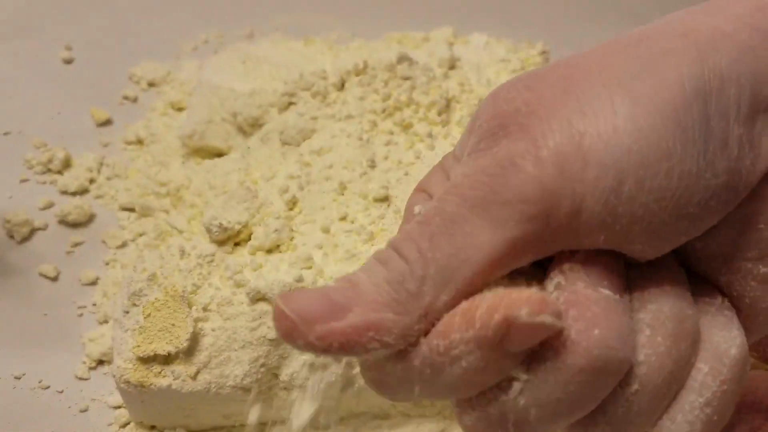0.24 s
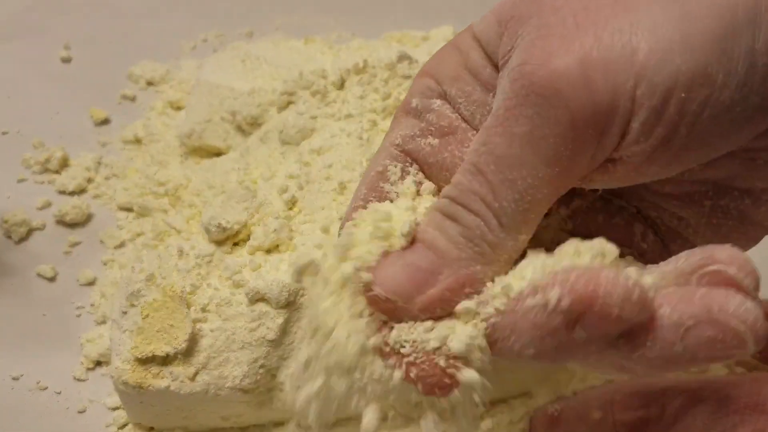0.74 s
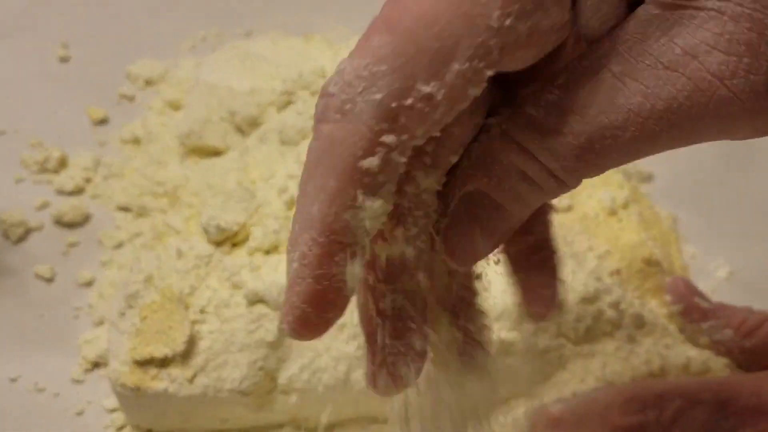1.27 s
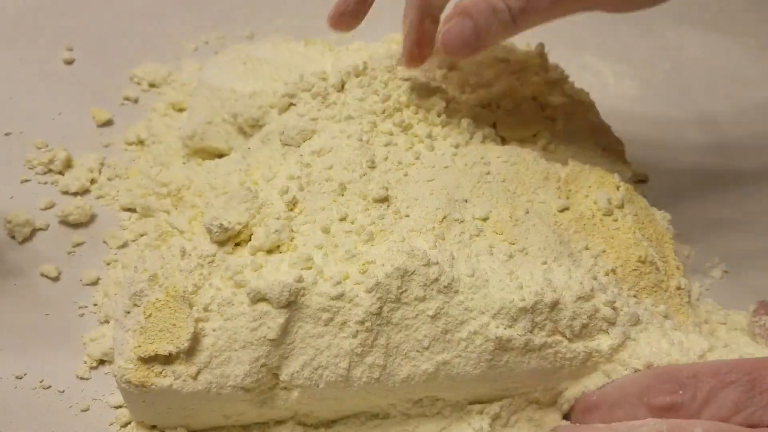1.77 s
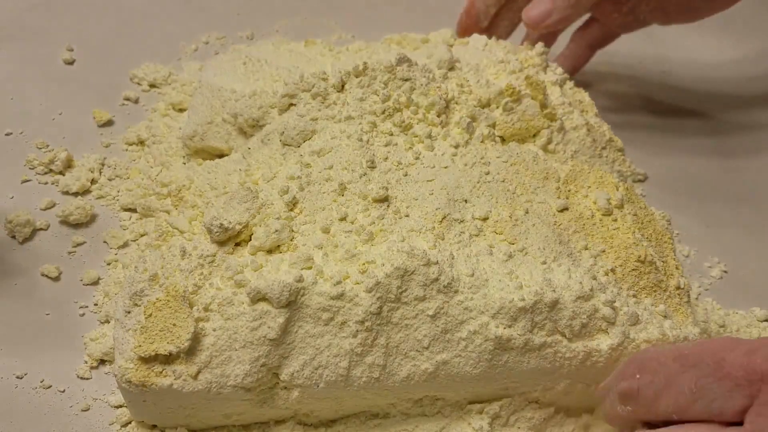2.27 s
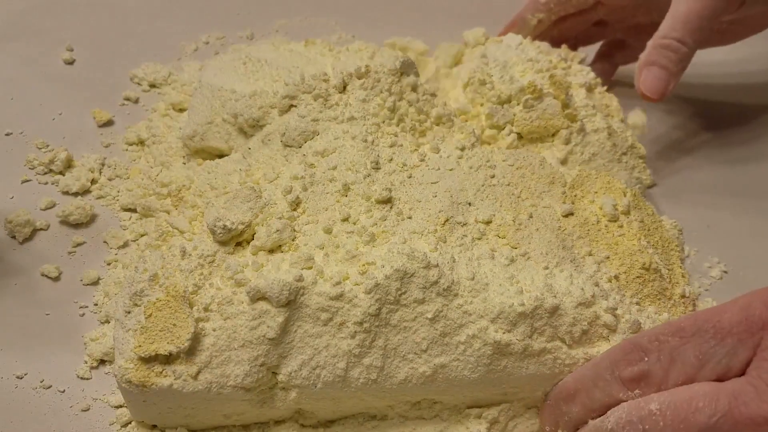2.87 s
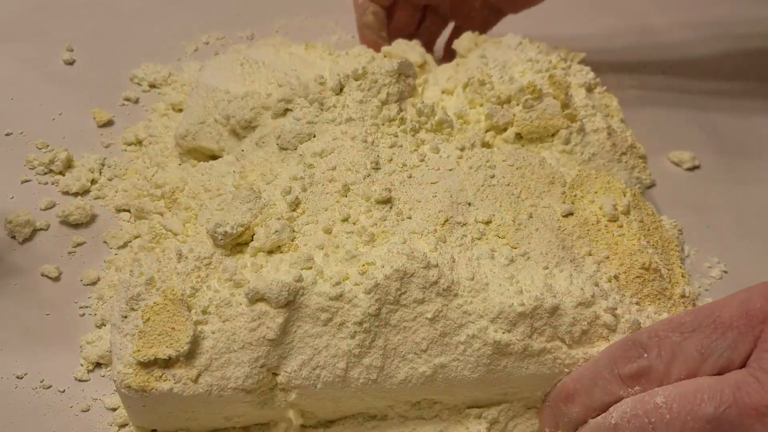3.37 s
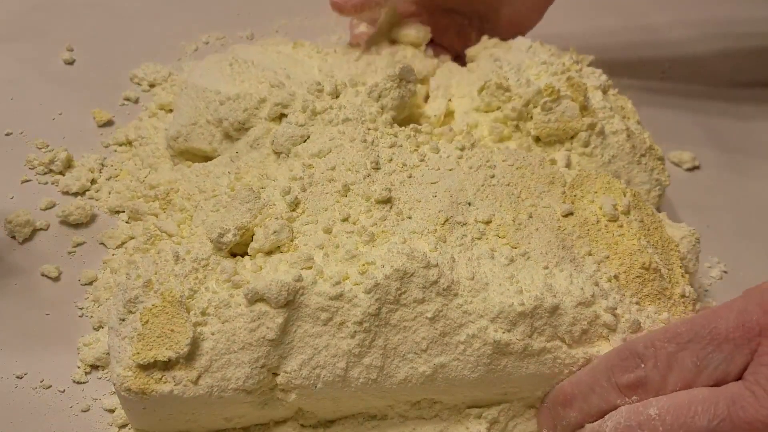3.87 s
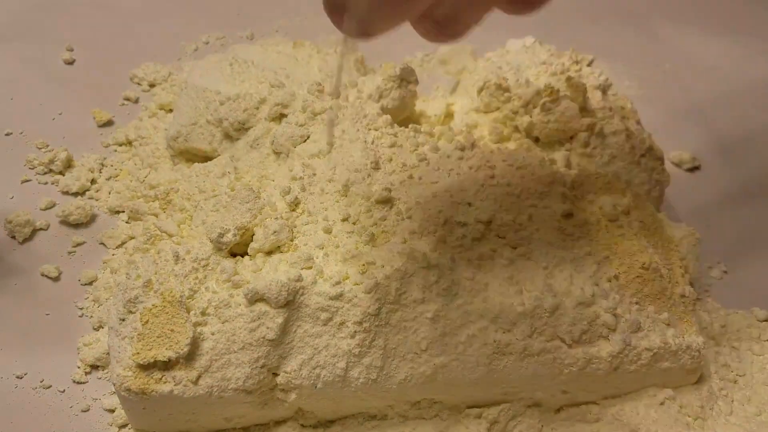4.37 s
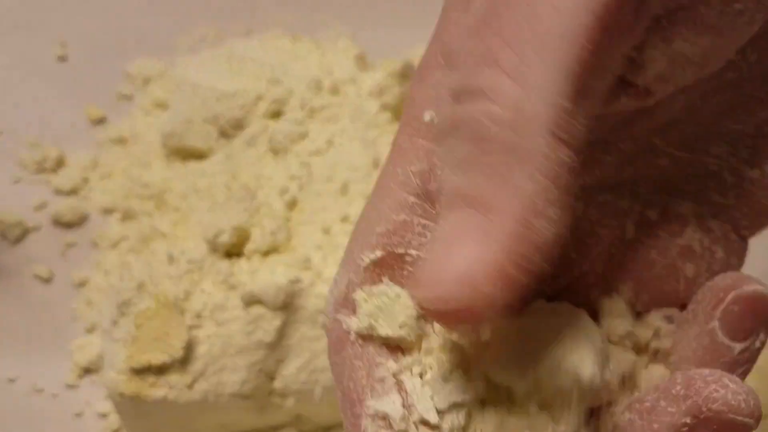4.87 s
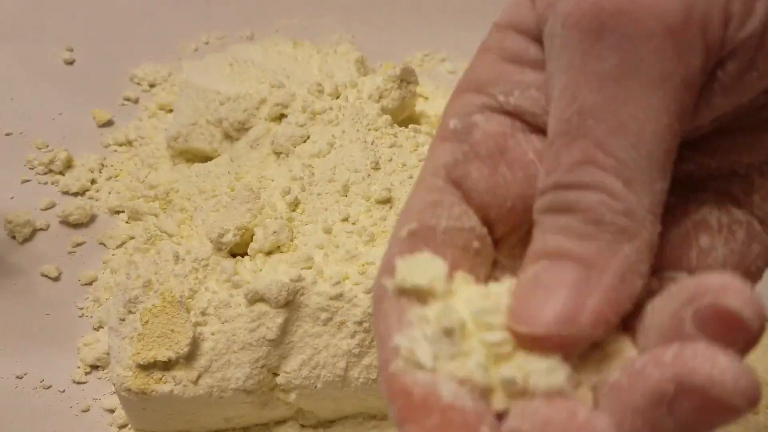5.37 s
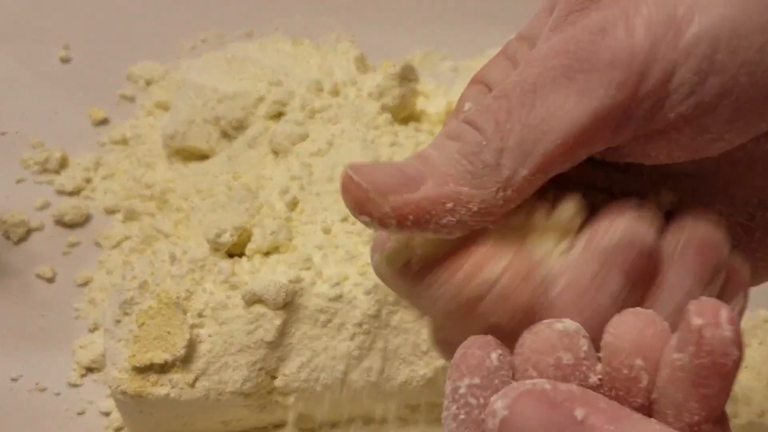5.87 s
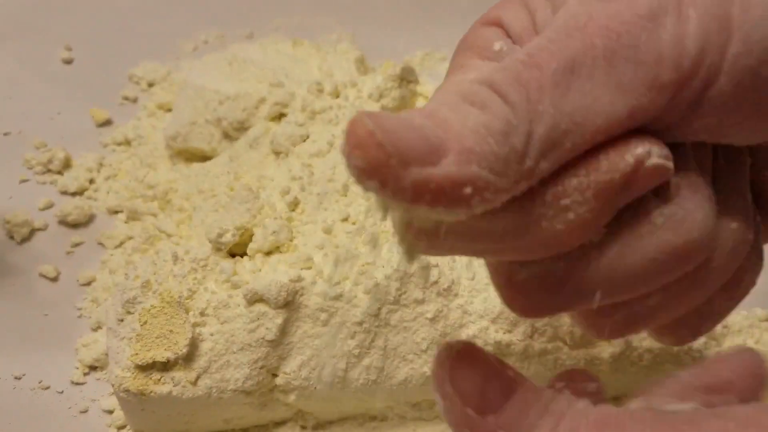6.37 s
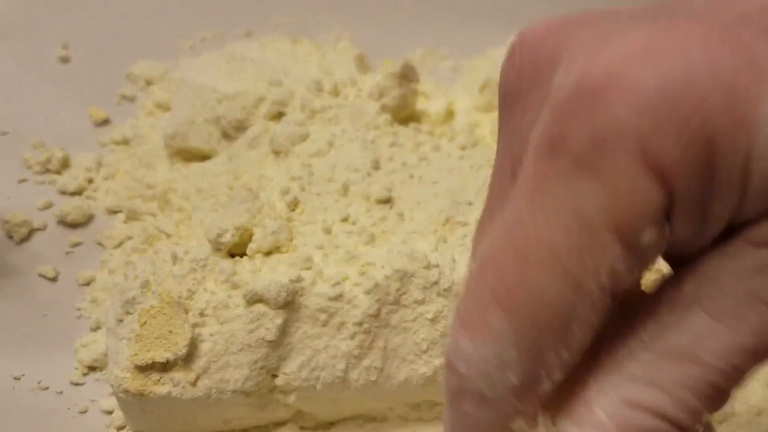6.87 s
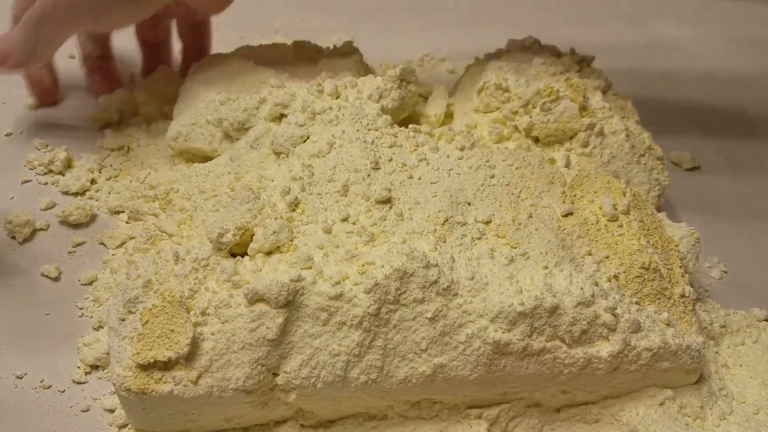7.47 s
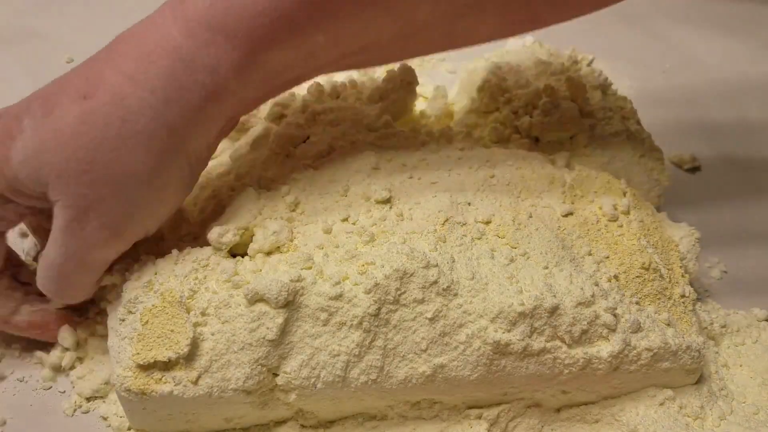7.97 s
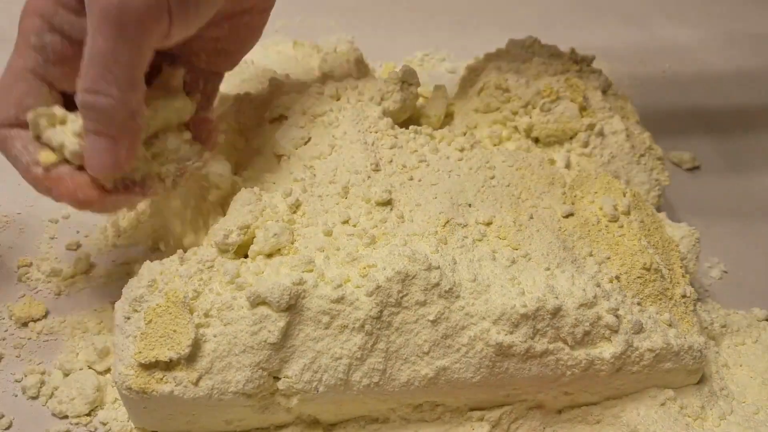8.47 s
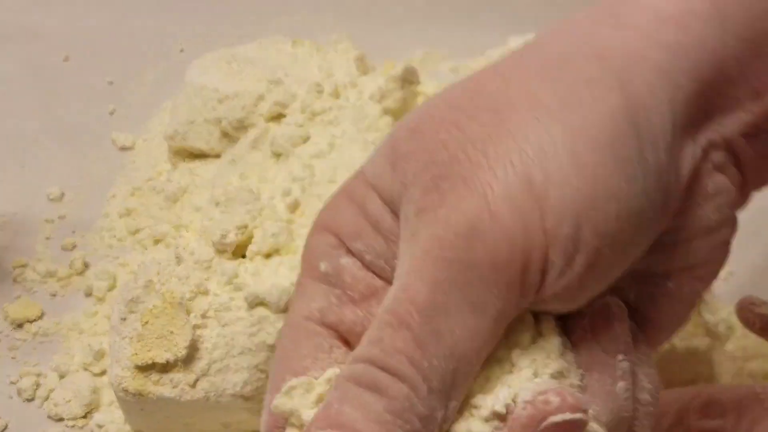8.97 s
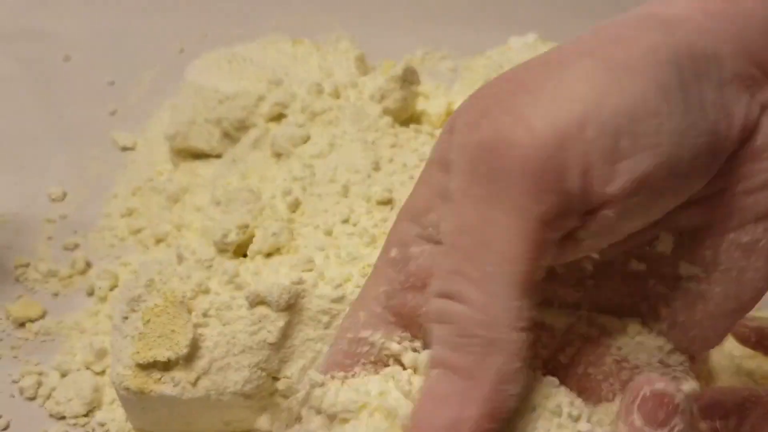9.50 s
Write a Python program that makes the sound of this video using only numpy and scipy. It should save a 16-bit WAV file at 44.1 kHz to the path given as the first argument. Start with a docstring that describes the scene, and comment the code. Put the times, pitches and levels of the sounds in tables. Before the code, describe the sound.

Hands crush dry pressed powder with crackles, crunches and hissing trickles, rake the pile over a table, then break lumps loudest near the end.

```python
"""Lumps crack off a slab of dry pressed powder, snap, and knock on a paper-covered table, heard from close by.
Each break is a click and a spray of noise, ringing in short resonances and in the modes of the table top.
Around it are streams of tiny random impacts: hissing powder, rubbing skin, pattering crumbs, a rumbling rake.
Creaks, pinging chips, dry ticks and soft hand bumps are placed one by one.
A stereo microphone pair hears it all in a small room with still air and a faint, unsteady hum."""
import sys
import numpy as np
from scipy import signal
from scipy.fft import rfft, irfft, next_fast_len
from scipy.io import wavfile
from scipy.ndimage import map_coordinates

SR = 44100
rng = np.random.default_rng(int(sys.argv[2]) if len(sys.argv) > 2 else 0)


def master_out(mix):
    """Clip the mix to full scale and print it as 16-bit PCM to the path in sys.argv[1]."""
    frames = np.transpose(np.atleast_2d(mix))
    ceiling = np.clip(frames, -1, 1)
    pcm = np.round(ceiling * 32767).astype(np.int16)
    wavfile.write(sys.argv[1], SR, pcm)


N = 429534

# Colour of the room's still air. Each row: frequency in Hz, relative level in dB per Hz.
AIR_COLOUR = [(20, 0), (50, 10), (90, 11.5), (135, 23), (200, -27.5), (330, 7), (700, -13), (2000, -53),
              (6000, -28), (16000, -80)]
# Decay of the small room. Each row: frequency in Hz, time to fall 60 dB in seconds.
WALL_DECAY = [(120, 0.04), (600, 0.2), (3000, 0.14), (14000, 0.02)]
# Ringing modes of the table top. Each row: frequency in Hz, gain at resonance in dB, time to fall 60 dB in seconds.
TABLE_MODES = [(81, -7, 0.1), (135, 3.5, 0.19), (256, -2, 0.26), (364, -10, 0.62), (572, -5.5, 0.17),
               (970, -7, 0.27)]
# Soft bumps of the hand on the table. Each row: start in seconds, peak level in dB.
HAND_BUMPS = [(4.178, -45.5), (4.907, -27), (4.931, -29.5), (5.236, -43)]
# Single crumbs clicking in the treble. Each row: time in seconds, strike level in dB.
CRUMB_TICKS = [(0.3077, -50), (0.467, -52), (0.608, -43), (1.1706, -65), (1.2235, -49), (1.393, -46),
               (1.4386, -38), (1.4714, -47), (1.5585, -49), (4.8642, -48), (6.6126, -43), (6.6434, -45.5)]
# Hard chips that ping as they split off. Each row: time in seconds, pitch in Hz, strike level in dB.
HARD_CHIPS = [(.9463, 1750, -44), (2.5358, 2880, -45), (4.9086, 2370, -47), (5.0721, 1630, -48),
              (5.9063, 2700, -44.5), (5.943, 2744, -48), (6.8655, 1750, -47.5), (8.9425, 2394, -37.5),
              (8.9585, 2284, -34.5), (9.0654, 2696, -42.5)]
# Powder creaking under a finger, or dragged low over the table. Each row: start in seconds, length in seconds,
# first pitch in Hz, last pitch in Hz, width in Hz of each of two equal filters at the first pitch, rms level in dB.
CREAKS = [(0.702, 0.077, 3070, 2570, 1000, -54), (0.897, 0.064, 1620, 1910, 500, -58),
          (2.396, 0.053, 672, 580, 420, -52.5), (3.089, 0.082, 507, 517, 109.8, -48.5),
          (3.127, 0.15, 473, 420, 260, -54), (3.084, 0.12, 2050, 1600, 1300, -59),
          (3.3, 0.596, 135, 135, 21.9, -52), (4.182, 0.067, 1490, 1510, 795, -52.5),
          (4.222, 0.21, 1500, 1700, 750, -60), (4.6, 0.11, 1000, 1450, 450, -63),
          (4.953, 0.32, 135, 135, 25, -51), (4.968, 0.14, 1600, 1600, 600, -56),
          (5.41, 0.25, 2880, 2080, 807, -64.5), (5.907, 0.018, 2750, 2760, 600, -45.5),
          (6.063, 0.14, 2380, 1885, 796, -63), (7.421, 0.31, 990, 1054, 377, -49),
          (7.454, 0.16, 140.8, 119.8, 70, -33.5), (7.744, 0.42, 938, 1090, 600, -58.5)]
# Crumbs spilling onto the table. Each row: peak in seconds, fall to 10 dB down in seconds,
# patter level in dB, rumble level in dB (both before the trims in crumbs).
CRUMB_SPILLS = [(.02, 0.13, -43.5, -43), (.21, 0.12, -43.5, -43), (.5, 0.055, -54, -48),
                (.73, 0.18, -55, -49), (.88, 0.049, -56, -42.5), (1.06, 0.15, -55, -55),
                (1.25, 0.059, -53.5, -47), (1.335, 0.08, -41.5, -57), (2.43, 0.023, -51.5, -53),
                (2.94, 0.036, -61, -48.5), (3.16, 0.077, -49, -50), (3.34, 0.15, -53, -48),
                (3.58, 0.1, -58, -47.5), (3.76, 0.041, -57.5, -47.5), (4.218, 0.11, -58, -58),
                (4.45, 0.079, -55, -56), (4.59, 0.049, -53, -65), (4.99, 0.088, -51, -48),
                (5.67, 0.11, -57, -56), (5.77, 0.075, -50.5, -45), (6.28, 0.022, -50, -60),
                (6.42, 0.058, -70, -50), (6.52, 0.28, -60, -59), (6.799, 0.047, -48, -46),
                (6.96, 0.1, -53, -45.5), (7.03, 0.11, -46.5, -39.5), (9, 0.095, -57, -50),
                (9.224, 0.026, -38, -34), (9.318, 0.59, -50.5, -43), (9.56, 0.15, -47, -41),
                (9.689, 0.2, -46, -44)]
# One long rake through the pile, easing off as the hand closes. Each row: time in seconds,
# patter level in dB, rumble level in dB (both before the trims in crumbs).
RAKE_LEVELS = [(7.285, -68.5, -67.5), (7.303, -48, -21.5), (7.36, -45, -38.5), (7.43, -50, -40),
               (7.49, -50, -30), (7.505, -37, -36), (7.58, -35, -34.5), (7.71, -44, -35.5),
               (7.84, -52.5, -35.5), (7.93, -51.5, -36), (8.03, -53, -46), (8.15, -57, -41.5),
               (8.4, -73, -59)]
# Fingers squeezing or stroking the powder. Each row: peak in seconds, rise from and fall to 10 dB down in seconds,
# powder hiss level in dB (before the lift in powder), skin rub level in dB.
FINGER_STROKES = [(.03, 0.19, 0.12, -50, -49.5), (.18, 0.052, 0.11, -49.5, -56.5),
                  (.33, 0.024, 0.29, -63, -60), (.47, 0.0071, 0.076, -57, -64),
                  (.54, 0.041, 0.19, -60, -55), (.71, 0.01, 0.075, -54, -51),
                  (.92, 0.082, 0.059, -55, -54.5), (1.24, 0.012, 0.12, -54, -57.5),
                  (1.32, 0.048, 0.059, -54, -55), (1.42, 0.19, 0.072, -50, -54.5),
                  (1.55, 0.15, 0.05, -52.5, -57.5), (1.67, 0.014, 0.066, -67, -57.5),
                  (1.78, 0.068, 0.63, -62, -58.5), (2.05, 0.096, 0.38, -58.5, -57.5),
                  (2.43, 0.082, 0.059, -62.5, -56), (2.7, 0.3, 0.39, -62.5, -60.5),
                  (3.18, 0.19, 0.11, -55, -56), (3.45, 0.25, 0.44, -65, -60.5),
                  (3.98, 0.073, 0.11, -71.5, -63.5), (4.29, 0.061, 0.1, -58, -70),
                  (4.58, 0.42, 0.28, -57, -56), (5, 0.095, 0.096, -49, -49.5),
                  (5.245, 0.091, 0.017, -63.5, -60), (5.64, 0.22, 0.048, -58, -54),
                  (5.75, 0.12, 0.22, -59.5, -58.5), (5.92, 0.02, 0.17, -58, -56),
                  (6.09, 0.065, 0.34, -62.5, -59), (6.315, 0.15, 0.067, -57, -51.5),
                  (6.42, 0.026, 0.23, -65.5, -70), (6.62, 0.041, 0.066, -60, -55.5),
                  (6.74, 0.029, 0.029, -53, -48), (6.8, 0.058, 0.17, -58, -60), (7, 0.24, 0.23, -48, -47),
                  (7.22, 0.15, 0.048, -54.5, -49.5), (7.31, 0.012, 0.11, -56, -51.5),
                  (7.5, .13, 0.39, -46.5, -51.5), (7.57, 0.064, 0.045, -56, -42),
                  (7.97, 0.18, 0.13, -53, -59), (8.18, 0.17, 0.14, -62, -60),
                  (8.475, 0.027, 0.22, -54.5, -51), (8.64, 0.17, 0.18, -50, -58),
                  (8.95, 0.18, 0.49, -43.5, -52), (9.19, 0.026, 0.17, -51, -60),
                  (9.64, 0.087, .13, -45.5, -54.5)]
# Lumps that break or land. Each row: time in seconds, then the strike level in dB of
# its knock, thud, snap and crack (before panning, filters and resonances).
BREAKS = [(0.0446, -40, -38, -48, -50), (0.0496, -44, -46, -38.5, -57), (0.1552, -39, -41, -42, -51.5),
          (0.186, -39, -37, -53, -44), (0.2164, -52, -35.5, -50, -48), (0.2348, -43.0, -63, -54, -47),
          (0.3013, -49, -48, -57, -53), (0.3275, -38.5, -45, -45, -48), (0.3354, -41.5, -73, -57, -43.5),
          (0.4719, -49, -58, -62, -49), (0.5096, -44.5, -52, -48, -53), (0.5838, -54, -48, -48, -43.5),
          (0.7023, -47, -51, -53, -41), (0.7329, -38, -43, -53, -46), (0.7654, -43.5, -41.5, -52.5, -47.5),
          (0.7954, -41.5, -45, -54.5, -51), (0.8641, -45, -49, -61.5, -59), (0.8712, -36, -38, -47, -48),
          (0.8808, -46, -45, -60, -58), (0.9268, -46.5, -59, -57, -56.0), (0.9982, -43, -40, -48, -44),
          (1.0573, -55, -46, -53, -48), (1.0709, -45.5, -69, -46.5, -49.5), (1.3024, -48, -43, -43, -37.5),
          (1.3176, -43, -42, -44.5, -39.5), (1.3255, -45, -41, -44, -46), (1.3549, -45.5, -46, -56, -41),
          (1.405, -52.5, -70, -44, -41), (1.4574, -43.5, -53, -41, -49), (2.4242, -49, -51.5, -51, -65.0),
          (2.5358, -50.5, -58, -48, -73), (3.7869, -54.5, -50, -66, -65), (4.3004, -54, -50, -55, -55),
          (4.5095, -58, -61, -58, -61.5), (4.5571, -50.5, -41, -67.5, -65.5), (4.5685, -42, -58, -48, -61),
          (4.5809, -52, -49, -57, -62), (4.6377, -51, -63, -65, -60.5), (4.7794, -47.5, -46, -54, -48.5),
          (4.914, -42.5, -51, -54, -54), (4.9804, -45.5, -64, -58.0, -62), (5.6463, -51.5, -48, -53, -66),
          (5.7394, -47.5, -42, -42.5, -60), (5.9063, -52, -60, -46, -50.5), (5.9132, -47.5, -64, -56, -41),
          (5.9427, -48.5, -72.5, -51, -40), (6.0513, -44, -58, -64.0, -62), (6.0719, -40, -54, -45, -62),
          (6.2701, -52, -42.5, -54.5, -49), (6.4034, -49, -37.5, -48.5, -44), (6.5067, -52, -53, -65, -54),
          (6.6337, -45.5, -47.0, -59, -52), (6.749, -50, -71.0, -52, -55.0),
          (6.7829, -45.5, -53, -60, -46.5), (6.8062, -46, -47.5, -71, -64.0),
          (6.8228, -45, -49, -66, -56.5), (6.9977, -44, -42, -50, -54), (7.0283, -54, -41, -59.0, -58),
          (7.0959, -46, -41, -62.5, -58.5), (7.3029, -43.5, -33, -45, -54.5),
          (7.3289, -47, -28, -59, -60.5), (7.4815, -40, -29, -57, -57), (7.5012, -33, -46, -52, -54.5),
          (7.5174, -36, -41, -46, -55), (7.538, -43, -28, -52, -58),
          (7.5625, -45, -39, -32, -54),(7.7019, -37.5, -34, -65.0, -57.0), (7.7592, -43, -35, -71, -61.0),
          (7.8699, -61, -35, -67.0, -60.5), (7.9207, -43.5, -32.5, -55, -63),
          (8.7957, -47, -59, -49, -51.5), (8.846, -42.5, -59, -66, -39), (8.9123, -39, -42.0, -45, -29),
          (8.9425, -41, -46, -46, -35), (8.9586, -33, -37.5, -32, -37), (8.9845, -29.5, -36, -48, -47),
          (9.0017, -38.5, -44, -47, -39.5), (9.0482, -38.5, -41, -40.5, -34),
          (9.0844, -34, -35.5, -59, -37), (9.1705, -40, -37, -61.0, -54), (9.1859, -35.5, -39, -55.0, -38),
          (9.1954, -28, -24, -61, -38), (9.222, -36, -39, -41, -40.5), (9.2424, -39, -41.5, -46.0, -50),
          (9.2744, -36.5, -59.5, -47, -51.0), (9.3855, -39.5, -45, -46, -52), (9.419, -46, -50, -44, -39),
          (9.4771, -46, -42, -49, -56), (9.5289, -35, -51, -46, -42), (9.5864, -44, -58, -43, -42),
          (9.7294, -42.5, -48, -56, -55)]
# Resonances of a knock on the table. Each row: centre frequency in Hz, Q, gain as a factor.
KNOCK_MODES = [(602.3, 19, 0.94), (1007, 22, 0.68)]
# Colours of the contacts: low thud, woody knock, snap, fine powder, skin on chalk.
# Each row: frequency in Hz, relative level in dB per Hz.
THUD_COLOUR = [(30, -44), (70, -27.5), (105, -6.5), (135, -3), (170, -1.5), (205, -2), (245, -4), (310, -8),
               (450, -8.5), (1200, -100)]
KNOCK_COLOUR = [(100, -28.5), (240, -5.5), (300, 0.5), (370, 1), (430, -9), (500, -0.5), (590, 2),
                (690, 0.5), (800, -4), (980, -5.5), (1250, -16.5), (2200, -23.5), (6000, -63.5)]
SNAP_COLOUR = [(300, -24), (900, 3.5), (1500, 0), (2000, -3), (2800, -10), (3800, -21), (12000, -46)]
POWDER_COLOUR = [(800, -46), (2500, -4.5), (4200, -4.5), (6000, -4), (8600, 0.5), (9800, -0.5),
                 (12000, 1.5), (15500, 0.5)]
RUB_COLOUR = [(300, -24.5), (900, -1.5), (1450, 0.5), (2000, -0.5), (2350, -1), (2800, -1), (3600, -5),
              (5000, -9), (12000, -26.5)]
# Place of the working hand. Each row: time in seconds, delay of the left microphone behind the right in ms.
HAND_DELAY = [(1.3, -0.013), (1.8, 0.05), (2.5, 0.17), (3, -0.0073), (6.8, -0.034), (7.3, -.24),
              (8.3, -0.22), (8.7, -0.048)]
# Colour difference of the microphones. Each row: frequency in Hz, left minus right in dB.
MIC_COLOUR = [(60, -1), (640, -0.4), (1200, -1.2), (3100, -0.5), (6820, 0.4), (15000, 2)]

TOP_HZ = 16050  # band limit of the recorder
STROKE_SHAPE, SPILL_SHAPE = 1.5, 0.86  # swell peaks: 1 = pointed, 2 = rounded
SPILL_RISE_S = 0.046  # rise from 10 dB down
SIFT_DB = (-71, -67.5)  # hiss and rub between strokes, before the lift in powder
SETTLE_DB = (-65, -62)  # patter and rumble between spills, before the trims in crumbs
BITS_PER_S = 70  # small lumps a second where the hiss is loudest
BIT_DB = (-3.5, -9.5, -5, -2.5)  # their knock, thud, snap and crack over the hiss level
STRIKE_S = 0.0069  # a strike level is the rms as if all the energy fell in this time
CHIP_Q = 2.4
SNAP_HZ = 1880
KNOCK_SPREAD, SNAP_SPREAD = 0.041, 0.43  # random pitch spread, in natural-log units
LEAD_S = 0.01  # each break starts this long before its main snap


def amp(db):
    """Decibels to gain."""
    return 10 ** (np.asarray(db) / 20)


def unit(x):
    """Scaled to rms 1."""
    return x / np.sqrt(np.mean(x ** 2) + 1e-20)


def along(points, hz):
    """(Hz, value) points read on a log frequency axis."""
    f, v = np.transpose(points)
    return np.interp(np.log(hz + 1), np.log(f), v)


def curves(rows):
    """One level per sample for each dB column after the time; silent outside the rows."""
    s, *columns = np.transpose(rows)
    now = np.arange(N) / SR
    return [np.interp(now, s, c, left=-np.inf, right=-np.inf) for c in columns]


def swells(events, shape, rest_db):
    """dB curves of overlapping swells, each 10 dB down one rise before its peak and one fall after it."""
    t = np.linspace(0, N / SR, 4000)
    power = np.outer(amp(rest_db) ** 2, np.ones_like(t))
    for s, rise, fall, *db in events:
        away = np.maximum((s - t) / rise, (t - s) / fall)
        power += amp(np.array(db)[:, None] - 10 * away ** shape) ** 2
    return curves(np.column_stack([t, *(10 * np.log10(power))]))


def wobble(rate):
    """A smooth random curve with rate knots a second."""
    knots = rng.standard_normal(int(N * rate / SR) + 4)
    return map_coordinates(knots, [np.arange(N) * rate / SR])


def add(track, s, sound):
    """Mix a sound into a track from time s on."""
    part = track[..., max(round(s * SR), 0):][..., :sound.shape[-1]]
    part += sound[..., :part.shape[-1]]


def coloured(x, spectrum, size=8192):
    """x through a causal minimum-phase filter of energy 1 with this spectrum."""
    level_db = along(spectrum, np.fft.rfftfreq(size, 1 / SR))
    cepstrum = irfft(np.log(amp(level_db)))
    # folding the cepstrum forward in time makes the filter causal
    cepstrum[1:size // 2] *= 2
    cepstrum[size // 2 + 1:] = 0
    response = irfft(np.exp(rfft(cepstrum)))
    response /= np.linalg.norm(response)
    return signal.oaconvolve(x, response[None], axes=1)[:, :N]


def resonate(x, hz, q):
    """x through one resonance of gain 1."""
    b, a = signal.iirpeak(hz, max(q, 1), SR)
    return signal.lfilter(b, a, x)


def gliding(x, from_hz, to_hz, q, count=5):
    """x through a steep resonance that moves in pitch by crossfading between fixed filters."""
    way = np.linspace(0, count - 1, x.shape[1])
    out = np.zeros_like(x)
    for k, hz in enumerate(np.geomspace(from_hz, to_hz, count)):
        fade = np.maximum(1 - abs(way - k), 0)
        out += fade * resonate(resonate(x, hz, q), hz, q)
    return out


def grains(rate, scatter_db, smooth, width):
    """Stereo stream of tiny impacts, rate a second, over a share of noise for grains too fine to tell apart."""
    hit = rng.random((3, N)) < rate / SR
    sizes = amp(scatter_db * np.clip(rng.standard_normal((3, N)), -2, 2))
    sizes = sizes * rng.choice([-1, 1], (3, N))
    smooth, width = np.clip([smooth, width], 0, 1)
    impacts = unit(hit * sizes / np.sqrt(rate))
    stream = np.sqrt(1 - smooth) * impacts + np.sqrt(smooth) * rng.standard_normal((3, N))
    # some of the sound reaches both microphones alike, the rest each on its own
    return np.sqrt(1 - width) * stream[0] + np.sqrt(width) * stream[1:]


def fracture(contact_s, debris_db, debris_s, width):
    """Force of one break: a few grains give way, the lump snaps 10 ms later, and its fragments spray."""
    t = (np.arange(SR // 10) - SR // 100) / SR
    draw = rng.standard_normal((6, len(t)))
    width = np.clip(width, 0, 1)
    common, apart = np.sqrt(1 - width), np.sqrt(width)
    if contact_s:
        contact = (common * draw[0] + apart * draw[1:3]) * np.exp(-abs(t) / contact_s)
    else:  # a click of one sample, alike in both channels
        contact = np.ones((2, 1)) * (t == 0) * np.sign(draw[0, 0])
    spray = np.where(t < 0, .2 * np.exp(-abs(t) / .003), np.exp(-abs(t) / debris_s))
    # cubing the noise makes it spiky, like separate fragments
    debris = (common * draw[3] ** 3 + apart * draw[4:] ** 3) * spray
    return unit(contact) + amp(debris_db) * unit(debris)


def blow(force, db):
    """A stereo force scaled by its energy to a strike level."""
    return amp(db) * force * np.sqrt(2 * STRIKE_S * SR / np.sum(force ** 2))


def background():
    """Still air as coloured noise, mostly alike at both microphones, and a faint, unsteady mains hum."""
    air = rng.standard_normal(N) + 0.27 * rng.standard_normal((2, N))
    hum = np.sin(2 * np.pi * 120 * np.arange(N) / SR + .3 * wobble(3))
    hum_db = -69.5 + 5.5 * wobble(11)
    return amp(-61.5) * coloured(air, AIR_COLOUR) + amp(hum_db) * hum


def room(x):
    """The short, diffuse answer of the walls as decaying noise; its bass is alike at both microphones."""
    hz, t, z = signal.stft(rng.standard_normal((3, SR // 3)), SR, nperseg=256)
    apart = (hz / np.hypot(hz, 500))[:, None]
    z = np.sqrt(1 - apart ** 2) * z[0] + apart * z[1:]
    decay = amp(-60 * t / along(WALL_DECAY, hz)[:, None])
    tail = signal.istft(z * decay, SR, nperseg=256)[1]
    tail = np.pad(tail, ((0, 0), (SR // 250, 0)))  # the walls answer 4 ms late
    return signal.oaconvolve(x, tail / np.linalg.norm(tail[0]), axes=1)[:, :N]


def table_ring():
    """Impulse response of the table top: decaying cosines, each with its listed gain at resonance."""
    t = np.arange(SR // 2) / SR
    ring = np.zeros(len(t))
    for hz, db, t60 in TABLE_MODES:
        to_resonance_gain = 2 * np.log(1000) / (t60 * SR)
        ring += amp(db - 60 * t / t60) * np.cos(2 * np.pi * hz * t) * to_resonance_gain
    return ring


def bumps():
    """A soft, slow blow of the hand rings mainly the lowest modes of the table."""
    out = np.zeros(N)
    push = np.hanning(round(.008 * SR))
    # the slowest part of the push moves no air: the table radiates its rate of change
    boom = signal.fftconvolve(table_ring(), np.diff(push))
    for s, db in HAND_BUMPS:
        add(out, s, amp(db) * boom / abs(boom).max())
    return out


def ticks():
    """A crumb too light to shake the table gives one dry, bright click."""
    out = np.zeros((2, N))
    for s, db in CRUMB_TICKS:
        click = fracture(contact_s=.0004, debris_db=-7, debris_s=.002, width=.8)
        add(out, s - LEAD_S, blow(click, db))
    return coloured(out, POWDER_COLOUR)


def chips():
    """A hard chip splits off in one click and rings for a few cycles."""
    out = np.zeros((2, N))
    for s, hz, db in HARD_CHIPS:
        click = fracture(0, debris_db=-5, debris_s=.004, width=.8)
        ping = resonate(click + 3 * resonate(click, hz, CHIP_Q), hz, CHIP_Q)
        add(out, s - LEAD_S, blow(ping, db))
    return out


def scrapes():
    """Packed powder sticks and slips: a swell of grains rings one resonance, which glides as the finger moves."""
    slips = grains(400, scatter_db=3.5, smooth=0.15, width=0.37)
    out = np.zeros((2, N))
    for s, length, from_hz, to_hz, width_hz, db in CREAKS:
        rasp = slips[:, round(s * SR):round((s + length) * SR)]
        ring = gliding(rasp, from_hz, to_hz, from_hz / width_hz)
        swell = np.sin(np.linspace(0, np.pi, ring.shape[1]))
        add(out, s, amp(db) * unit(ring * swell))
    return out


def crumbs():
    """Crumbs patter and tick on the paper, and their weight and the raking fingers shake the table."""
    events = [(s, SPILL_RISE_S, *rest) for s, *rest in CRUMB_SPILLS]
    spills = swells(events, SPILL_SHAPE, SETTLE_DB)
    patter_db, rumble_db = np.maximum(spills, curves(RAKE_LEVELS))
    clumps = wobble(50)  # the flow comes unevenly
    patter = grains(130, scatter_db=4, smooth=.05, width=.3)
    patter = patter * amp(patter_db + .3 + 1.3 * clumps)
    rumble = grains(220, scatter_db=-0.5, smooth=0.23, width=0.022)
    rumble = rumble * amp(rumble_db - 5.0 + 0.17 * clumps)
    bright = amp(-15.0) * coloured(patter, SNAP_COLOUR)
    return coloured(patter, KNOCK_COLOUR) + bright + coloured(rumble, THUD_COLOUR)


def powder(hiss_db, rub_db):
    """Fine powder shears and trickles with coarser crumbs in it, under rasping skin; more flow, more grains."""
    slip = wobble(60)
    density = amp(.5 * (hiss_db - hiss_db.max()))
    hiss = grains(2000 * density, scatter_db=0.0, smooth=0.73, width=1.0)
    rub = grains(1100 * density, scatter_db=3, smooth=0.62, width=0.94)
    grit = amp(-9) * grains(35, scatter_db=3, smooth=0, width=.5)
    hiss = (hiss + grit) * amp(hiss_db + 4.0 + 1.4 * slip)
    rub = (rub + grit) * amp(rub_db + 2 * density * wobble(40))
    return coloured(hiss, POWDER_COLOUR) + coloured(rub, RUB_COLOUR)


def bits(hiss_db):
    """Small lumps give way at random, more often and louder the more powder flows; rows like BREAKS."""
    chance = BITS_PER_S / SR * amp(hiss_db - hiss_db.max())
    at = np.flatnonzero(rng.random(N) < chance)
    return [(i / SR, *(hiss_db[i] + np.array(BIT_DB))) for i in at]


def lumps(breaks):
    """Each lump cracks in the treble, snaps at its own pitch and knocks on the table beneath it."""
    thud, knock, snap, crack = np.zeros((4, 2, N))
    for s, knock_db, thud_db, snap_db, crack_db in breaks:
        at = s - LEAD_S
        side, spot, size = np.clip(rng.standard_normal(3), -2, 2)
        pan = amp(side * np.array([[1], [-1]]))
        weight = fracture(0, debris_db=-7, debris_s=0.021, width=0.0053)
        add(thud, at, blow(weight, thud_db))
        tap = blow(fracture(0, debris_db=-2.5, debris_s=0.017, width=0.47), knock_db)
        # the knock rings a little higher or lower with where the lump lands
        shift = np.exp(KNOCK_SPREAD * spot)
        ring = sum(gain * resonate(tap, hz * shift, q) for hz, q, gain in KNOCK_MODES)
        add(knock, at, pan * (tap + ring))
        split = blow(fracture(0, debris_db=5, debris_s=0.016, width=0.65), snap_db)
        snap_ring = resonate(split, SNAP_HZ * np.exp(SNAP_SPREAD * size), q=2.8)
        add(snap, at, pan * (0.67 * split + 0.84 * snap_ring))
        burst = fracture(contact_s=0.00029, debris_db=-2.0, debris_s=0.0036, width=0.86)
        add(crack, at, pan * blow(burst, crack_db))
    low = coloured(thud, THUD_COLOUR) + coloured(knock, KNOCK_COLOUR)
    return low + coloured(snap, SNAP_COLOUR) + coloured(crack, POWDER_COLOUR)


def placed(pair):
    """The sound reaches the microphone nearer to the hand first: half the delay is put on each side."""
    now = np.arange(N)
    lag = np.interp(now / SR, *np.transpose(HAND_DELAY)) * SR / 1000  # ms to samples
    left = map_coordinates(pair[0], [now - lag / 2], order=3)
    right = map_coordinates(pair[1], [now + lag / 2], order=3)
    return np.array([left, right])


def scene():
    """The crumbling slab on its table, close by in a small room."""
    hiss_db, rub_db = swells(FINGER_STROKES, STROKE_SHAPE, SIFT_DB)
    hands = bumps() + ticks() + chips() + scrapes() + powder(hiss_db, rub_db)
    blows = crumbs() + lumps([*BREAKS, *bits(hiss_db)])
    table = signal.oaconvolve(blows, table_ring()[None], axes=1)[:, :N]
    close = placed(blows + table + hands)
    return close + amp(-13.0) * room(close) + background()


def record(dry):
    """The two microphones differ a little in colour; the recorder keeps nothing above its band limit."""
    size = next_fast_len(N + SR // 4)
    hz = np.fft.rfftfreq(size, 1 / SR)
    colour = amp(along(MIC_COLOUR, hz) * np.array([[.5], [-.5]]))
    return irfft(rfft(dry, size) * colour * (hz < TOP_HZ), size)[:, :N]


dry = scene()
out = record(dry)
master_out(out)
```